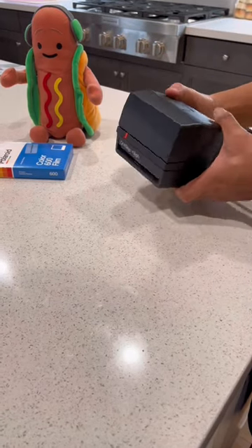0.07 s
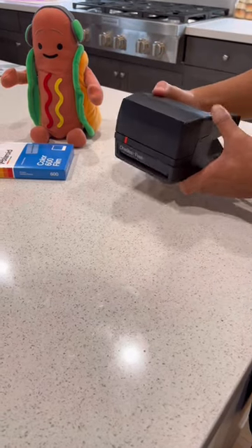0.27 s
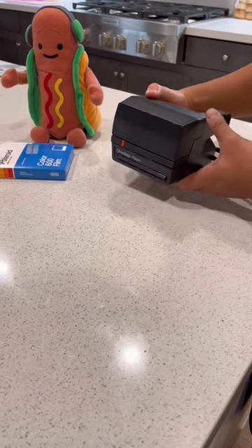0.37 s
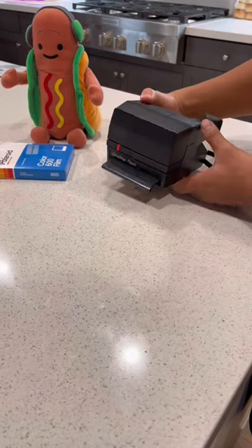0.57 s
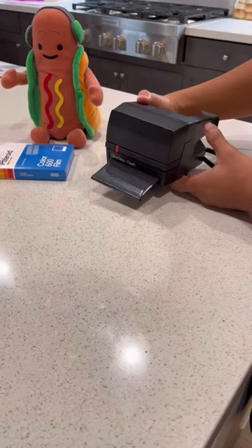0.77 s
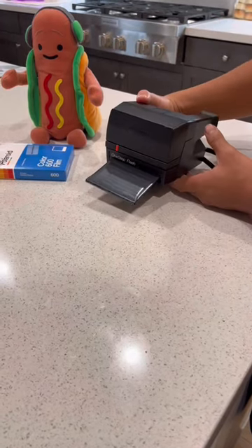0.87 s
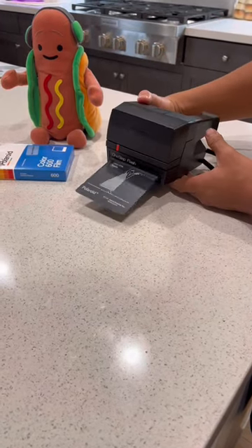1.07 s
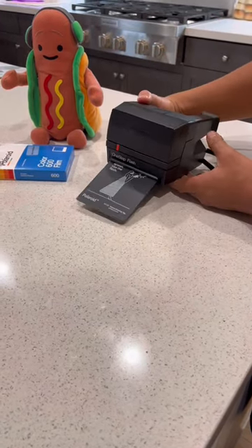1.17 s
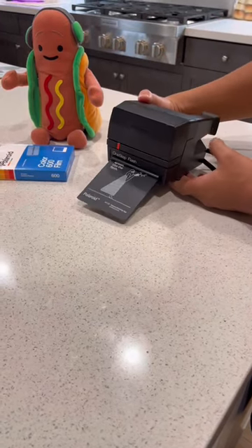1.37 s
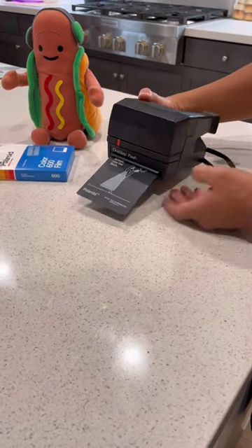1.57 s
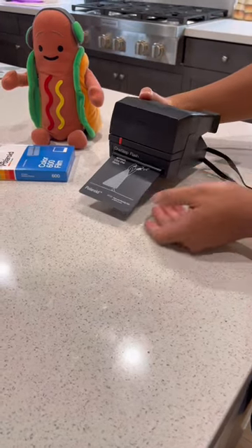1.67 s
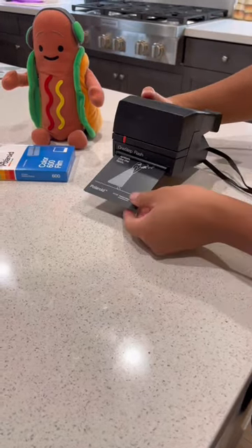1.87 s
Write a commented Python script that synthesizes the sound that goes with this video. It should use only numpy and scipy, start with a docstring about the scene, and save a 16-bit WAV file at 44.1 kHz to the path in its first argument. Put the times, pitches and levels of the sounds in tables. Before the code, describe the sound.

Close by in a quiet, slightly echoing kitchen, an instant camera ejects a photo: a buzzing motor and hissing gears, a few clicks, one loud snap with a brief rattle, and a final soft clunk.

```python
"""An instant camera ejects a sheet above a kitchen counter, over a faint rumble and mains hum. Its small
motor hums, gear teeth rattle and pawls click. The rollers grip: the motor sags, the gears whine and
the sheet rasps out. A latch snaps as the sheet comes free, a spring chatters and the case knocks.
The motor stops with a clunk, a faint tone lingers and the room rings out, with two last tiny ticks."""
import sys
import numpy as np
from scipy import signal
from scipy.fft import rfft, irfft
from scipy.io import wavfile

SR = 44100
rng = np.random.default_rng(int(sys.argv[2]) if len(sys.argv) > 2 else 0)


def log_audio(samples):
    """Write samples as a 16-bit WAV file to the path given in sys.argv[1]."""
    # one column per channel
    frames = np.atleast_2d(samples).T
    # limit to full scale, then quantise
    limited = np.clip(frames, -1, 1)
    pcm = np.round(limited * 32767).astype(np.int16)
    wavfile.write(sys.argv[1], SR, pcm)


N = 83790
T = np.arange(N) / SR
FREQS = np.maximum(np.arange(N + 1) * SR / (2 * N), 1)
SIDE_SIGN = np.array([[1], [-1]])  # left, right
GRIP_S, FREE_S, STOP_S = .25, .92, 1.3  # rollers grip, rollers let go, motor stops
# load on the gear teeth: time_s, gain_db
GEAR_LOAD = [(0, -2.5), (.185, -1), (.205, -6), (.25, -0.5), (.35, -1), (.47, 1.5), (.5, 3), (.6, 2),
             (.92, 2.5), (1.08, 3.5), (1.15, -8.5), (1.22, -2.5), (1.29, -2)]


def undb(db):
    """Decibels to gain."""
    return 10 ** (np.asarray(db) / 20)


def unit(x):
    """Scale to an rms of one."""
    return x / np.sqrt(np.mean(x ** 2))


def curve(rows):
    """Join (time_s, value) rows by straight lines."""
    return np.interp(T, *np.array(rows).T)


def across(rows, hz=FREQS):
    """Read (freq_hz, value) rows on a log-frequency axis."""
    f, v = np.array(rows).T
    return np.interp(np.log(hz), np.log(f), v)


def filtered(x, response):
    """Apply a frequency response."""
    return irfft(rfft(x, 2 * N) * response)[..., :N]


def colour(x, db):
    """Causal EQ with the given gain at each frequency."""
    cepstrum = irfft(np.log(undb(db)))
    cepstrum[1:N] *= 2
    cepstrum[N + 1:] = 0
    return filtered(x, np.exp(rfft(cepstrum)))


def walk(rate_hz):
    """Smooth random wander with an rms of one."""
    return unit(filtered(rng.standard_normal(N), np.exp(-(FREQS / rate_hz) ** 2)))


def fade(start_s, decay_s):
    """Hold at one, then die away exponentially."""
    return np.exp(-np.maximum(T - start_s, 0) / decay_s)


def ring(start_s, hz, t60_s):
    """A struck mode."""
    age = np.maximum(T - start_s, 0)
    return np.sin(2 * np.pi * hz * age) * np.exp(-np.log(1000) * age / t60_s)


def grains(per_s, scatter_db):
    """A dense train of tiny impacts, scattered in level."""
    hits = (rng.random(N) < per_s / SR) * rng.choice([-1, 1], N)
    return unit(hits * undb(scatter_db * rng.standard_normal(N)))


def spread(width_db):
    """Two channels of noise, partly alike; width is side over middle."""
    middle, side = rng.standard_normal((2, N))
    return (middle + SIDE_SIGN * filtered(side, undb(width_db))) / np.sqrt(2)


def turns(hz, wobble, flutter):
    """Turns made by a slightly unsteady shaft."""
    return np.cumsum(hz * (1 + wobble * walk(12.5) + flutter * walk(120))) / SR


def partial(shaft, multiple):
    """A tone locked to a shaft, wavering in level."""
    return np.sqrt(2) * np.sin(2 * np.pi * (multiple * shaft + rng.random())) * undb(1.3 * walk(15))


def room_tone(rumble_db=-62, mains_db=-67.5, mains_hz=119):
    """A bed of low rumble and mains hum."""
    # rumble EQ: freq_hz, gain_db
    rumble_eq = [(25, -19.5), (50, -12.5), (120, 1), (170, -3), (240, -2.5), (400, -11), (700, -23.5),
                 (2000, -39), (4200, -37.5), (8000, -50.5), (15000, -65)]
    noise = spread(across([(100, -11.5), (2000, -3.5)]))
    rumble = unit(colour(noise, across(rumble_eq)))
    return undb(rumble_db) * rumble + undb(mains_db) * np.sin(2 * np.pi * mains_hz * T)


def motor_hum(shaft, engaged, gripping):
    """The shaft's harmonics change balance as the rollers grip and let go."""
    # one row per harmonic: free_db, loaded_db, sheet_out_db
    harmonics = [(-50, -62, -58), (-54, -54.5, -53), (-50, -50.5, -58), (-51, -56, -51.5), (-66, -62, -55),
                 (-68, -61, -57), (-65, -57, -66), (-64, -68, -56), (-70, -68, -68)]
    released = engaged - gripping
    return sum(undb(free * (1 - engaged) + loaded * gripping + after * released) * partial(shaft, k)
               for k, (free, loaded, after) in enumerate(harmonics, 1))


def gear_teeth(mesh):
    """Tiny tooth impacts blur into a bright hiss that follows the load."""
    # tooth EQ: freq_hz, gain_db
    teeth_eq = [(700, -14), (1400, -5), (2500, -5), (3000, -3), (3650, -.5), (4400, 1), (4900, 1.5),
                (5600, -7), (6400, -4), (7200, -7), (8700, -4), (9400, 1), (10200, -4), (11300, -.5),
                (12400, -10), (15200, -7)]
    # stereo width: freq_hz, side_over_middle_db
    width = [(1000, -10), (2500, -5), (4500, -6), (8000, -13), (12000, -17)]
    middle, side = (grains(per_s=7000, scatter_db=1.5) for _ in range(2))
    impacts = middle + SIDE_SIGN * colour(side, across(width))
    return unit(colour(impacts * mesh, across(teeth_eq))) * undb(-40 + curve(GEAR_LOAD))


def case_rattle(mesh, gripping):
    """The teeth shake the case, a little harder while the rollers grip."""
    # body of the case: freq_hz, gain_db
    case_eq = [(60, -22), (140, -16), (240, -4.5), (450, 1.5), (800, 0.5), (1200, -5), (2000, -8.5),
               (4000, -16.5), (12000, -42.5)]
    impacts = grains(per_s=3000, scatter_db=1) * mesh
    return unit(colour(impacts, across(case_eq))) * undb(-46 + 2 * gripping)


def shell(force, ring_db):
    """A force on the shell gives a broad crack and a short plastic ring."""
    # shell modes: pitch_hz, relative_db, t60_s
    modes = [(1344, 6, 0.0087), (1790, -1.5, 0.023), (2966, -3.5, 0.017), (3830, -4.5, 0.021),
             (4690, 0.5, 0.045), (8470, -12.5, 0.0072), (9370, -8, 0.036)]
    # crack EQ: freq_hz, gain_db
    crack_eq = [(50, -51.5), (200, -9), (500, -11), (900, -4), (1750, 8.5), (2200, 0), (2900, 1.5),
                (4500, 11.5), (6000, -5.5), (7000, -2.5), (10000, -0.5), (15500, -16.5)]
    ringing = unit(sum(undb(db) * ring(0, hz, t60) for hz, db, t60 in modes))
    resonance = rfft(ringing, 2 * N) / np.sqrt(N)
    return colour(force, across(crack_eq)) + undb(ring_db) * filtered(force, resonance)


def latch_clicks():
    """Latch and pawls strike hard and die away in tiny rebounds, a little different on each side."""
    # strikes: start_s, level_db, decay_s, centre_hz, falloff_db_per_octave_squared
    strikes = [(.197, -34, .05, 9000, 3.5), (.205, -37, .09, 4550, 51), (.2105, -30, .003, 3000, 1),
               (.7591, -21, .0022, 1500, 4), (.852, -28.5, .0045, 1400, 4.5),
               (.9495, -23.5, .004, 10500, 14), (.9785, -24, .002, 3500, 5), (1.0138, -22, .004, 9500, 8),
               (1.016, -20, .003, 3000, 1), (1.018, -17.5, .0022, 5000, 2),
               (1.0198, -15.5, .0018, 7000, 1.5), (1.0264, -5, .0018, 2400, .5),
               (1.0283, -10, .0016, 13000, 1.5), (1.029, -12.5, .0035, 1500, 4),
               (1.093, -29, .006, 8000, 2), (1.2924, -31, .0074, 7000, 2), (1.85, -65, .0077, 3000, 3),
               (1.87, -70, .0071, 4000, 1)]
    # stereo width: freq_hz, side_over_middle_db
    width = [(1000, -20), (2200, -9), (6000, -7), (9000, -14)]
    clicks = np.zeros((2, N))
    for start, db, decay, hz, falloff in strikes:
        rebounds = rng.choice([-1, 1], (2, N)) * (T >= start) * fade(start, decay)
        focus_db = -np.minimum(falloff * np.log2(FREQS / hz) ** 2, 30)
        click = shell(colour(rebounds, focus_db), ring_db=-8.5)
        clicks += undb(db) * unit(click) * np.sqrt(decay / 2 * SR / N)
    middle, side = clicks
    return middle + SIDE_SIGN * colour(side, across(width))


def case_knocks(roughness=.44):
    """Levers land softly in the case, each with a short, rough, low ring."""
    # landings: start_s, strength_db, pitch_hz, t60_s
    knocks = [(.205, -36, 290, .05), (.21, -29, 580, .025), (.213, -31, 780, .025), (1.034, -25, 950, .025),
              (1.055, -30, 340, .035), (1.0945, -18.5, 600, .022), (1.096, -26, 1050, .018),
              (1.103, -28, 780, .03), (1.294, -27, 1220, .035), (1.2955, -26, 990, .028),
              (1.3, -19.5, 320, .028), (1.302, -29, 1110, .03), (1.311, -28, 260, .06),
              (1.318, -31, 450, .02), (1.319, -34, 1000, .035), (1.3445, -36, 420, .02),
              (1.36, -36, 330, .04)]
    # the small case radiates little bass: freq_hz, gain_db
    radiation = [(60, -38), (150, -14), (260, -1), (1250, 0), (2000, -10), (4000, -25)]
    rings = sum(undb(db) * ring(start, hz, t60) * (1 + roughness * walk(200))
                for start, db, hz, t60 in knocks)
    return colour(rings, across(radiation))


def gear_whine(shaft):
    """The gear train whines as it drags the sheet."""
    # whine tones: shaft_multiple, level_db
    tones = [(3.45, -57), (9.85, -60), (13.6, -58), (14.05, -56), (15.65, -50.5), (22, -57), (24.3, -56)]
    return sum(undb(db) * partial(shaft, multiple) for multiple, db in tones)


def roller_hum():
    """The roller gear hums at its own unsteady pitch."""
    # roller gear: time_s, pitch_hz
    pitch = [(.26, 228), (.42, 230), (.54, 238), (.63, 231), (.8, 231), (1.0, 238)]
    # harmonics 1 to 3: level_db
    harmonics = [-56, -48.5, -62]
    roller = turns(curve(pitch), wobble=.004, flutter=.011)
    return sum(undb(db) * partial(roller, k) for k, db in enumerate(harmonics, 1))


def sheet_rasp(mesh):
    """The sheet scrapes between the rollers, pulsing with the gears."""
    # rasp EQ: freq_hz, gain_db
    rasp_eq = [(1000, -12), (2000, -7), (2550, -9), (2850, 0), (3300, 0), (3700, -9), (8000, -25)]
    friction = grains(per_s=2500, scatter_db=2.5) * mesh
    return unit(colour(friction, across(rasp_eq))) * undb(-49.5 + curve(GEAR_LOAD))


def drive(grip_ramp_s=.046):
    """The motor pulls the sheet through, then coasts to rest; gives the hum and the gear noise."""
    # motor speed, sagging as the rollers grip: time_s, turns_per_s
    speed = [(0, 212), (.19, 213), (.24, 203), (.285, 192), (.34, 194), (.41, 204), (.5, 205), (.56, 209),
             (.65, 204), (.8, 205), (.95, 208), (1.1, 210), (1.24, 217), (1.3, 208), (1.52, 30)]
    engaged = np.clip((T - GRIP_S) / grip_ramp_s + .5, 0, 1)
    gripping = np.clip(np.minimum(T - GRIP_S, FREE_S - T) / grip_ramp_s + .5, 0, 1)
    shaft = turns(curve(speed), wobble=.001, flutter=.003)
    hum = motor_hum(shaft, engaged, gripping) + gripping * (gear_whine(shaft) + roller_hum())
    mesh = undb(.38 * np.cos(2 * np.pi * shaft) + .57 * walk(54))  # a slight, uneven pulse each turn
    gears = gear_teeth(mesh) + case_rattle(mesh, gripping) + gripping * sheet_rasp(mesh)
    return hum * fade(STOP_S, decay_s=.07), gears * fade(STOP_S, decay_s=.052)


def spring_chatter(start_s=1.04, hold_s=.04, level_db=-33):
    """The spring rattles for a moment after the latch lets go."""
    # spring EQ: freq_hz, gain_db
    spring_eq = [(80, -21.5), (400, 2), (1100, -1), (2000, -6.5), (4000, -7), (9000, -15.5)]
    envelope = (T > start_s) * fade(start_s + hold_s, decay_s=.03)
    rattle = shell(grains(per_s=1800, scatter_db=0), ring_db=-2)
    return undb(level_db) * unit(colour(rattle, across(spring_eq))) * envelope


def lingering_tone():
    """A faint tone hangs on after the motor stops."""
    # partials: pitch_hz, level_db, t60_s
    tones = [(386, -51.5, 1.82), (743, -64, 1.95)]
    return sum(undb(db) * ring(STOP_S, hz, t60) for hz, db, t60 in tones)


def kitchen_echo(send, build_s=.013):
    """Hard kitchen surfaces return a diffuse echo, widest in the midrange."""
    # room decay: freq_hz, t60_s
    decay = [(150, 1.1), (500, 0.72), (2000, 0.91), (4000, 0.8), (9000, 0.61), (15000, 0.18)]
    # echo strength: freq_hz, gain_db
    echo_eq = [(150, -14), (600, -6), (2000, -6), (4000, -4), (9000, -8.5), (15000, -17.5)]
    noise = spread(across([(150, -7.5), (700, 2.5), (3000, -4.5), (10000, -23)]))
    octaves = np.log2(np.clip(FREQS, 125, 16000) / 125)
    impulse = 0
    for k in range(8):
        band = filtered(noise, np.maximum(1 - abs(octaves - k), 0))
        t60 = across(decay, 125 * 2 ** k)
        tail = np.exp(-np.log(1000) * T / t60) * (1 - np.exp(-T / build_s))
        impulse += band * unit(tail) / np.sqrt(N)
    return filtered(colour(send, across(echo_eq)), rfft(impulse, 2 * N))


def scene(hum_send_db=-5, knock_send_db=-5):
    """The camera and its echo over the room tone."""
    hum, gears = drive()
    clatter = gears + latch_clicks() + spring_chatter()
    knocks = case_knocks()
    bed = room_tone()
    echo = kitchen_echo(clatter + undb(hum_send_db) * hum + undb(knock_send_db) * knocks)
    return bed + hum + clatter + knocks + lingering_tone() + echo


def record(dry, top_hz=15900):
    """Two microphone ports hear the sound slightly apart; the top is cut."""
    # phase lead of the left port: freq_hz, lead_rad
    port_lead = [(20, 0), (1400, 0), (2000, .4), (2800, 1.9), (4400, 2.2), (5900, 3.14), (9000, 6.28),
                 (12600, 9.42), (15000, 12.5)]
    # left port over right: freq_hz, gain_db
    port_gain = [(200, -0.4), (1400, 1.3), (2800, 0.7), (5000, 0), (9000, -0.1)]
    balance = undb(across(port_gain) / 2)
    left = filtered(dry[0], balance)
    right = filtered(dry[1], np.exp(-1j * across(port_lead)) / balance)
    high_cut = signal.ellip(8, .2, 70, top_hz, fs=SR, output="sos")
    return signal.sosfilt(high_cut, np.array([left, right]))


dry = scene()
out = record(dry)
log_audio(out)
```